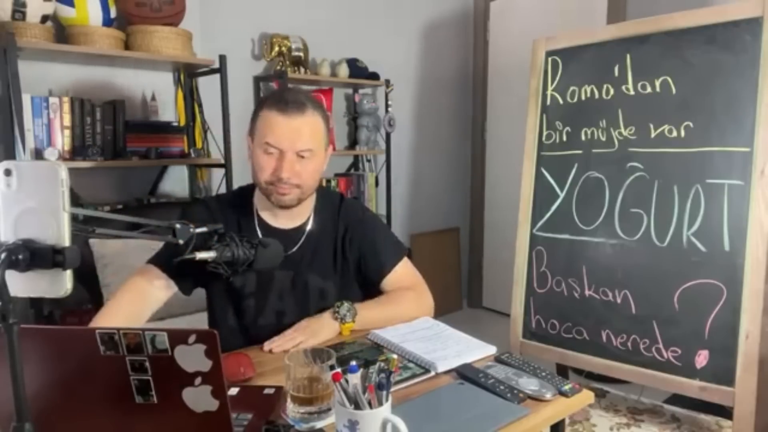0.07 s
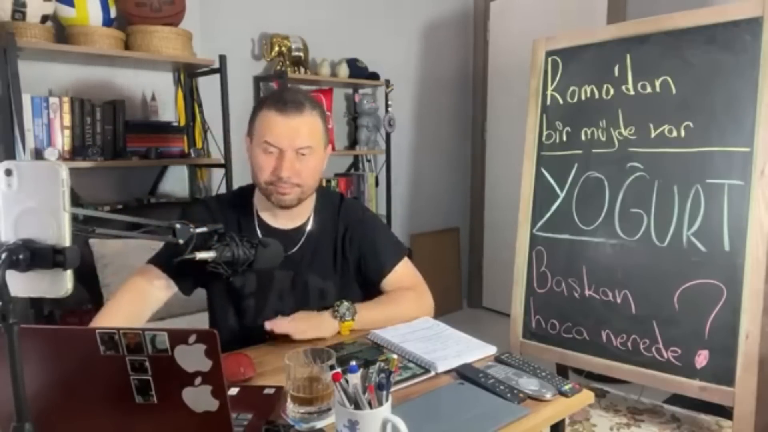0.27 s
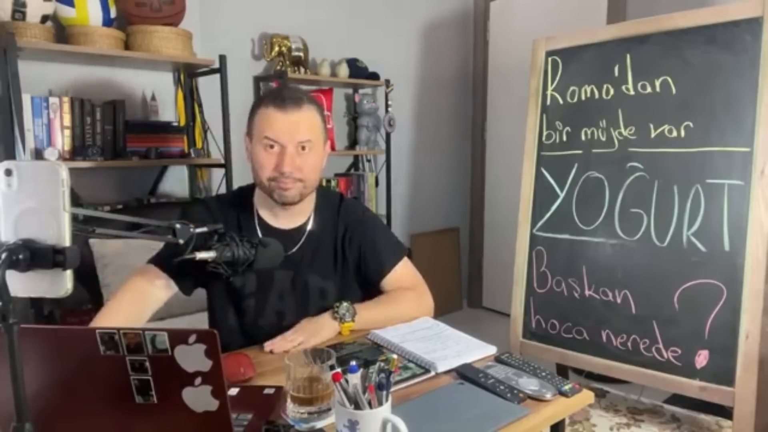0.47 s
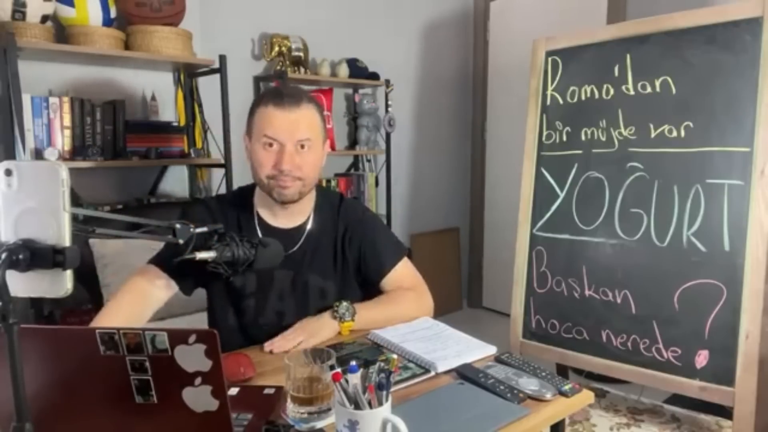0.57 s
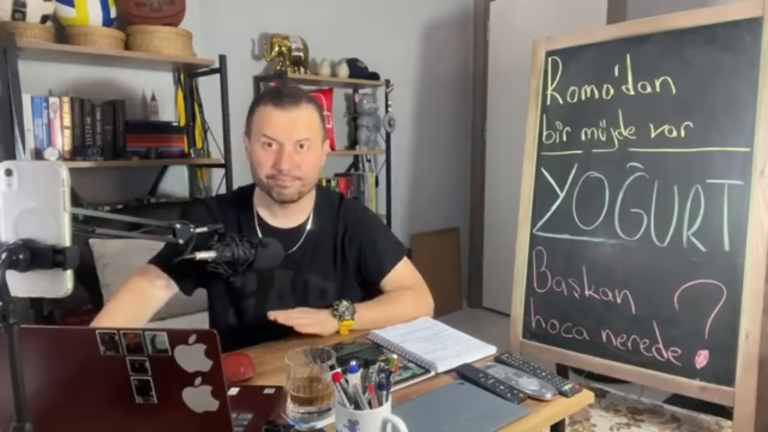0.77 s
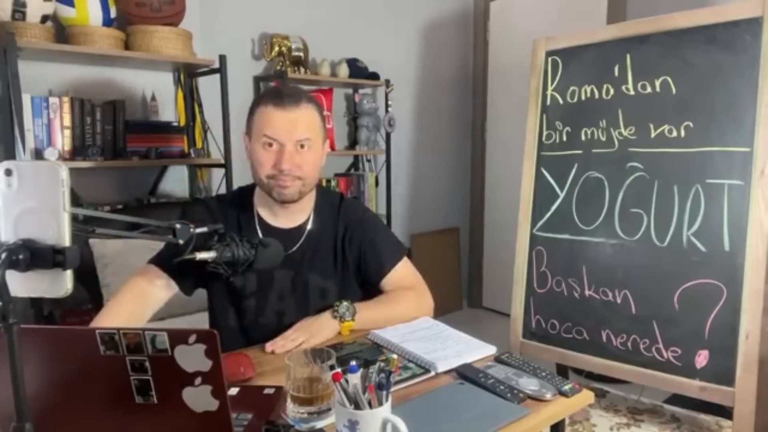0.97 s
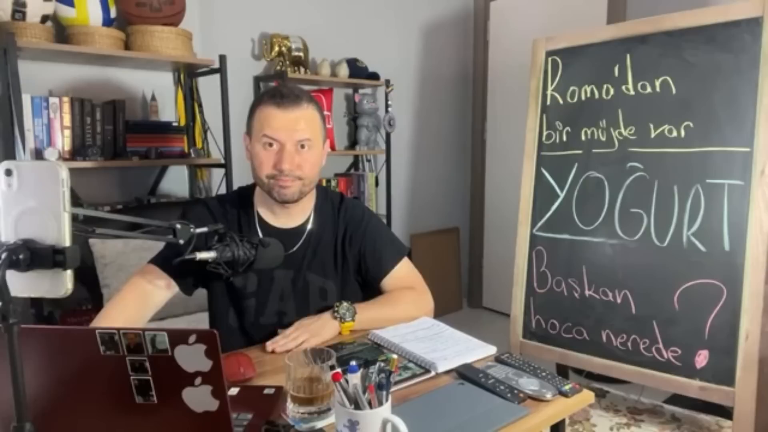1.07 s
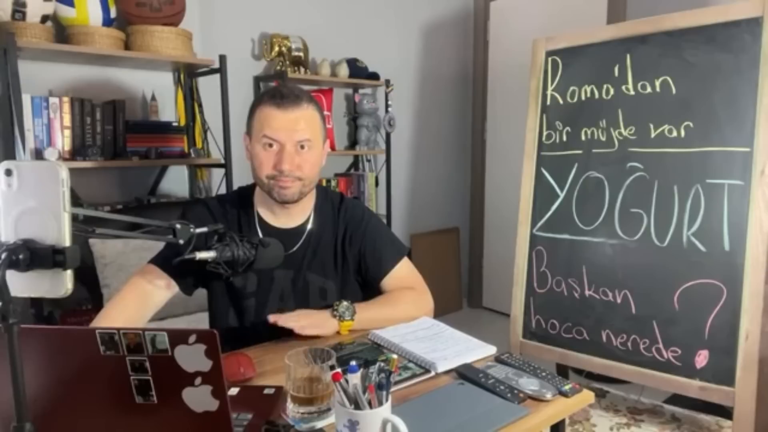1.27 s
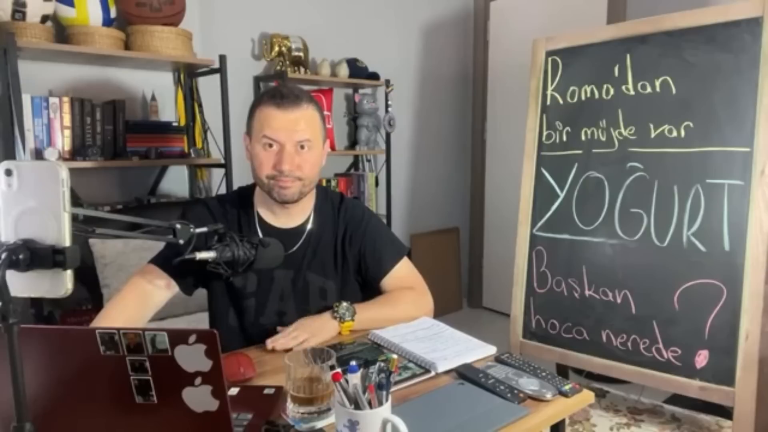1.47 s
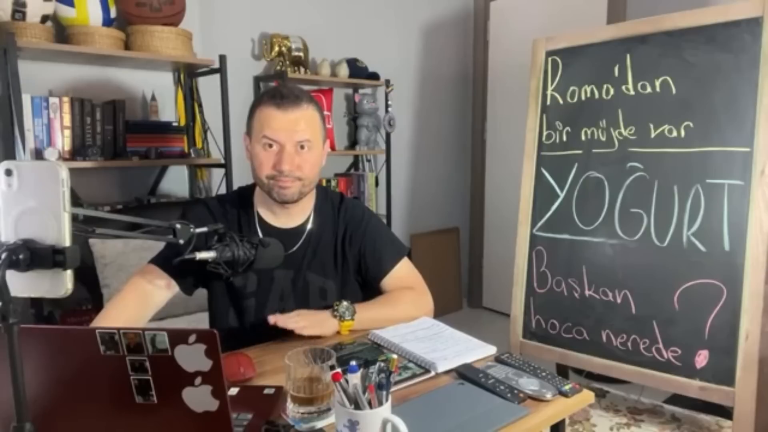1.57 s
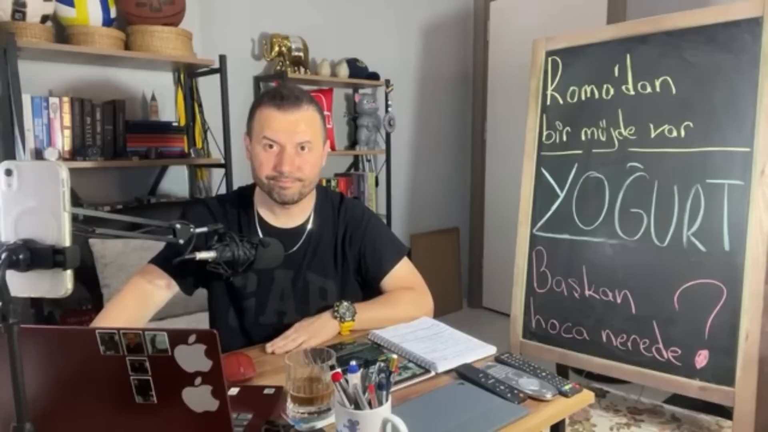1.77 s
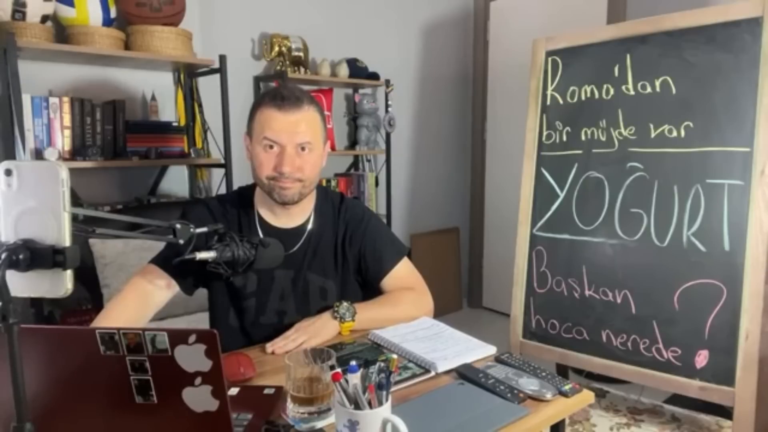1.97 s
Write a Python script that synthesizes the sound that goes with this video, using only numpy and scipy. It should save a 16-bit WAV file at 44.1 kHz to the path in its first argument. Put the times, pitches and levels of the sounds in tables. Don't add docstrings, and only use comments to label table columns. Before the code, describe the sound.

Sharp open-palm slaps on a wooden desktop, boomy and close, with small objects jumping and clicking

```python
import sys
import numpy as np
from scipy import signal
from scipy.fft import rfft, irfft, next_fast_len
from scipy.io import wavfile

SR = 44100
rng = np.random.default_rng(int(sys.argv[2]) if len(sys.argv) > 2 else 0)


def ratio_of_db(decibels):
    return 10 ** (np.asarray(decibels, float) / 20)


def waveform_to_disk(signal):
    frames = np.transpose(np.atleast_2d(signal))
    scaled = np.clip(frames, -1, 1) * 32767
    samples = np.round(scaled).astype(np.int16)
    wavfile.write(sys.argv[1], SR, samples)


N = 88288
PRE = SR // 10
LIFE = np.arange(SR // 2) / SR


def along(points, hz):
    f, v = np.transpose(points)
    return np.interp(np.log(hz + 1), np.log(f + 1), v)


def add(track, start_s, x):
    part = track[PRE + round(start_s * SR):][:len(x)]
    part += x[:len(part)]


def noise(spectrum, size):
    m = next_fast_len(size + 8192)
    hz = np.fft.rfftfreq(m, 1 / SR)
    x = irfft(rfft(rng.standard_normal(m)) * ratio_of_db(along(spectrum, hz)), m)[:size]
    return x / np.sqrt(np.mean(x ** 2))


def burst(spectrum, t60_s, rise_s=0.00085):
    return noise(spectrum, len(LIFE)) * ratio_of_db(-60 * LIFE / t60_s) * (1 - np.exp(-LIFE / rise_s))


def snap(spectrum, size=1024):
    cepstrum = irfft(np.log(ratio_of_db(along(spectrum, np.fft.rfftfreq(size, 1 / SR)))), size)
    cepstrum[1:size // 2] *= 2
    cepstrum[size // 2 + 1:] = 0
    click = irfft(np.exp(rfft(cepstrum)), size)
    return click / np.linalg.norm(click)


def ring(modes, scatter_db, rough, rate_hz, linger=0):
    hz, db, t60_s = np.transpose(modes)[..., None]
    knots = rng.standard_normal((len(hz), rate_hz))
    shake = np.array([np.interp(LIFE * rate_hz, np.arange(rate_hz), k - k[0]) for k in knots])
    decay = ratio_of_db(-60 * LIFE / t60_s) + linger * ratio_of_db(-60 * LIFE / (t60_s * 3.43))
    strike = ratio_of_db(db + scatter_db * rng.standard_normal(hz.shape))
    level = strike * decay * (1 - np.exp(-LIFE / 0.00017))
    return np.sum(level * np.sin(2 * np.pi * hz * LIFE + 2 * rough * shake), axis=0)


def below(x, top_hz, edge_hz):
    m = next_fast_len(x.shape[-1] + 4096)
    fade = np.clip((top_hz - np.fft.rfftfreq(m, 1 / SR)) / edge_hz, 0, 1) ** 2
    return irfft(rfft(x, m) * fade, m)[..., :x.shape[-1]]


# frequency in Hz, level in dB per Hz.
HUSH_COLOUR = [(15, -51), (25, -6.5), (101, 0.5), (457, -19.5), (582, -24), (1950, -29.5), (4040, -38),
               (11500, -36), (15500, -39)]
# centre in seconds, half width in seconds, level in dB.
SLEEVE_STROKES = [
    (.22, 0.038, -68),
    (0.459, 0.069, -68),
    (.92, 0.023, -85),
    (1.33, 0.064, -89),
]
# frequency in Hz, level in dB per Hz.
CLOTH_COLOUR = [(500, -25), (1500, 12), (4000, 5), (9000, 4), (15000, -18)]
# centre in seconds, half width in seconds, level in dB.
FINGER_SCUFFS = [
    (.12, 0.002, -59.5),
    (.175, 0.0024, -61),
    (.285, 0.018, -67),
    (.447, 0.0068, -62),
    (.465, 0.0027, -61.5),
]
# frequency in Hz, level in dB per Hz.
SCUFF_COLOUR = [(400, -18), (800, 0), (1600, -3), (2600, 0), (3500, -11.5), (6000, -15.5)]


def strokes(rows, t):
    return sum(ratio_of_db(db) * np.exp(-.5 * ((t - s) / width_s) ** 2) for s, width_s, db in rows)


def background():
    t = (np.arange(PRE + N) - PRE) / SR
    hush = ratio_of_db(-60) * noise(HUSH_COLOUR, len(t))
    sleeve = strokes(SLEEVE_STROKES, t) * noise(CLOTH_COLOUR, len(t))
    fingers = strokes(FINGER_SCUFFS, t) * noise(SCUFF_COLOUR, len(t))
    return hush + sleeve + fingers


# frequency in Hz, t60 in seconds.
ROOM_T60 = [(100, 0.51), (400, 0.28), (1500, 0.27), (5000, 0.28), (12000, 0.21)]


def room(x):
    out = np.zeros(len(x))
    cuts = [PRE + round((row[0] - .03) * SR) for row in SLAPS[1:]]
    edges = [0] + cuts + [len(x)]
    for a, b in zip(edges, edges[1:]):
        hz, t, z = signal.stft(rng.standard_normal(SR), SR, nperseg=1024, noverlap=896)
        z = z * ratio_of_db(-60 * t / along(ROOM_T60, hz)[:, None])
        tail = signal.istft(z, SR, nperseg=1024, noverlap=896)[1]
        wet = signal.fftconvolve(x[a:b], tail / np.linalg.norm(tail))
        add(out, (a - PRE) / SR + .003, wet)
    return out


# frequency in Hz, level in dB per Hz.
ROCK_TICK_COLOUR = [(300, -7), (600, 2.5), (1200, -4.5), (2500, -12.5), (6000, -51.5)]


def rocking(count=6):
    out = np.zeros(PRE + N)
    start_hz, end_hz, sag_s, rise_s, t60_s = 345, 140, .008, .003, .055
    first_s, every_s = .0905, .0495
    level_db, loss_db, scatter_db = -29.5, .3, .7
    hz = end_hz + (start_hz - end_hz) * np.exp(-LIFE / sag_s)
    shape = (1 - np.exp(-LIFE / rise_s)) ** 2 * ratio_of_db(-60 * LIFE / t60_s)
    for slap_s, *_ in SLAPS:
        for k, (late, size, pitch) in enumerate(rng.standard_normal((count, 3))):
            tone = shape * np.sin(2 * np.pi * np.cumsum(hz) * (1 + .04 * pitch) / SR)
            thud = tone + ratio_of_db(-30) * burst(ROCK_TICK_COLOUR, 0.018)
            thud_db = level_db - k * loss_db + scatter_db * size
            add(out, slap_s + first_s + k * every_s + .0012 * late, ratio_of_db(thud_db) * thud)
    return out


# start in seconds, peak level in dB.
PEN_DROPS = [(0.0114, -31.5), (0.0523, -35), (0.1481, -55), (0.5082, -33), (0.6025, -23.5), (0.6978, -44),
             (1.051, -23.5), (1.1308, -45), (1.3084, -64.5), (1.4571, -28), (1.5944, -56.5),
             (1.8292, -31.5)]
# frequency in Hz, level in dB, t60 in seconds.
PEN_MODES = [(1729, -1, 0.052), (2123, -9.5, 0.014), (2547, -7, 0.01), (3050, 2, 0.015),
             (3304, -10.5, 0.06), (5060, -18, 0.09)]
# frequency in Hz, level in dB per Hz.
PEN_COLOUR = [(500, -24), (1100, -8.5), (1800, 2), (3300, -5.5), (4500, -14), (9000, -29), (15000, -25.5)]


def drops():
    out, sent = np.zeros((2, PRE + N))
    late_s = .0005
    for s, db in PEN_DROPS:
        click = ring(PEN_MODES, 1.4, .8, 250) + ratio_of_db(6.5) * burst(PEN_COLOUR, 0.018, 0.00078)
        add(out, s + late_s, ratio_of_db(db - 7.5) * click)
        add(sent, s + late_s, ratio_of_db(db + 14.5) * snap(PEN_COLOUR))
    return np.array([out, sent])


# frequency in Hz, level in dB, first t60 in seconds.
BOARD_MODES = [(47, -6.5, 0.19), (67.1, -8.5, 0.09), (92.7, -1.5, 0.076), (129.6, -9.5, 0.092),
               (147.3, 5.5, 0.023), (194.8, -5.5, 0.12), (240.26, -7, 0.18), (296.5, -2, 0.058),
               (349.3, -18, 0.21), (418, -5, 0.098), (459, 1, 0.027), (530, -37, 0.081),
               (705, -16.5, 0.057), (850, -10, 0.094)]
# frequency in Hz, level in dB, t60 in seconds.
SWAY_MODES = [(51.84, -2.5, 1.7), (69.6, -1, 1.8), (82.3, -0.5, 1.6), (174.4, -10, 1.5)]


def pushed_board(modes, push):
    return signal.fftconvolve(ring(modes, 0.5, .35, 25, linger=ratio_of_db(-12)), np.diff(push))


def thumps():
    out, t = np.zeros(PRE + N), LIFE[:SR // 50]
    push_s, push_lead_s, push_late_s, land_s = 0.00685, .0055, .0007, 0.0018
    push = np.sin(np.pi * np.clip(t / push_s, 0, 1) ** 1.915) ** 2
    land = np.sin(np.pi * np.clip(t / land_s, 0, 1)) ** 2
    fade = np.cos(np.pi * LIFE) ** 2 * (1 - np.exp(-LIFE / 0.0209))
    for (s, thump_db, *_), (*_, land_db, _) in zip(SLAPS, HOPS):
        add(out, s + push_late_s - push_lead_s, ratio_of_db(thump_db - 7.5) * pushed_board(BOARD_MODES, push))
        add(out, s + HOP_LATE_S - .001, ratio_of_db(land_db) * pushed_board(BOARD_MODES[5:], land))
        add(out, s, ratio_of_db(thump_db - 37) * fade ** 0.25 * ring(SWAY_MODES, 1.6, 0.62, 12))
    return out


HOP_LATE_S = .0065
# frequency in Hz, level in dB, t60 in seconds.
LOOSE_MODES = [(666.7, -17, 0.24), (878, -1.5, 0.054), (900, -8.5, 0.055), (1144, -1.5, .07),
               (1376, 4.5, 0.034), (1527, -15.5, 0.24), (1700, -16.5, 0.05), (2480, -56.5, 0.16),
               (2990, -19.5, 0.073), (3430, -18.5, 0.069), (4950, -37.5, 0.11), (5650, -32, 0.086)]
# frequency in Hz, level in dB, t60 in seconds.
GLASS_MODES = [
    (2730, 0, .16),
    (2758, -7, .12),
]


def hop(loose_db, glass_db):
    loose = ring(LOOSE_MODES, 1.5, .9, 150)
    glass = ring(GLASS_MODES, 0, 0.42, 40)
    return ratio_of_db(loose_db) * loose + ratio_of_db(glass_db) * glass


# frequency in Hz, level in dB per Hz.
SKIN_COLOUR = [(500, -17.5), (1200, -9.5), (2500, -0.5), (4000, 0.5), (7000, -8), (11000, -6.5),
               (15000, -18.5), (16500, -12.5)]


def crack(cup_hz):
    cup_t60_s = 0.0036
    cup = ring([(cup_hz, 0, cup_t60_s), (cup_hz * 2.03, -5, cup_t60_s)], 0, 0, 10)
    return 0.43 * burst(SKIN_COLOUR, 0.013, .0003) + ratio_of_db(2) * cup


# start in seconds, thump in dB, crack in dB, fingertip lead in seconds, palm pitch in Hz.
SLAPS = [
    (-.047, -12, -9.5, 0.015, 3050),
    (.5298, -13.5, -10.5, 0.0075, 2620),
    (.9733, -8.5, -10.5, 0.0086, 3050),
    (1.3904, -9.5, -7.5, 0.0047, 3706),
    (1.7671, -11.5, -10, 0.0059, 3930),
]
# loose things in dB, glass in dB, rattle in dB, landing knock in dB,
# share sent into the room in dB.
HOPS = [
    (-23, -35, -11, -26.5, 3),
    (-33, -36.5, -26.5, -32.5, -0.5),
    (-20, -36, -19, -22.5, 1.5),
    (-24, -29, -13, -24, 1.5),
    (-25.5, -32.5, -15.5, -28.5, 0.5),
]
# frequency in Hz, level in dB per Hz.
RATTLE_COLOUR = [(300, -22), (600, 2.5), (1400, -4.5), (2000, -11), (3000, -3.5), (6000, -20),
                 (14500, -26.5), (15500, -59.5)]
# frequency in Hz, level in dB per Hz.
SPREAD_COLOUR = [(400, -20), (900, 4.5), (1500, 1), (3000, 3.5), (5000, -6.5), (9000, -9.5), (15000, -14.5)]


def slaps():
    out, sent = np.zeros((2, PRE + N))
    for (s, _, crack_db, lead_s, cup_hz), (loose_db, glass_db, rattle_db, land_db, sent_db) in zip(SLAPS, HOPS):
        add(out, s - 0.018, ratio_of_db(crack_db - 44.5) * burst(SCUFF_COLOUR, .06, 0.0026))
        tips = noise(RATTLE_COLOUR, len(LIFE)) * (LIFE < lead_s) * (0.1 + LIFE / lead_s)
        add(out, s - lead_s, ratio_of_db(crack_db - 17.5) * tips)
        add(out, s, ratio_of_db(crack_db) * crack(cup_hz))
        add(out, s + 0.00044, ratio_of_db(crack_db + 1.5) * snap(SKIN_COLOUR))
        add(sent, s, ratio_of_db(sent_db) * snap(SPREAD_COLOUR))
        add(out, s + 0.00109, ratio_of_db(rattle_db) * burst(RATTLE_COLOUR, 0.038, 0.0059))
        hopping = hop(loose_db, glass_db)
        landing = ratio_of_db(land_db + 2) * burst(SKIN_COLOUR, 0.0078)
        add(out, s + HOP_LATE_S, hopping + landing)
        add(sent, s + HOP_LATE_S, ratio_of_db(-2.5) * hopping)
    return np.array([out, sent])


def scene():
    low = thumps()
    hand, hand_sent = slaps()
    click, click_sent = drops()
    echoes = room(ratio_of_db(-10.5) * low + ratio_of_db(-7) * (hand_sent + click_sent))
    soft = below(click + echoes + background(), 15200, 100)
    return (low + rocking() + hand + soft)[None, PRE:]


def top_cut(x):
    return signal.sosfilt(signal.butter(12, 16460, fs=SR, output="sos"), x)


def record(dry):
    bass_cut = signal.butter(6, 43, "high", fs=SR, output="sos")
    mix = below(signal.sosfilt(bass_cut, dry), 16600, 1500)
    return top_cut(mix)


dry = scene()
out = record(dry)
waveform_to_disk(out)
```